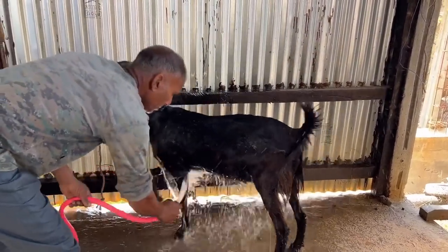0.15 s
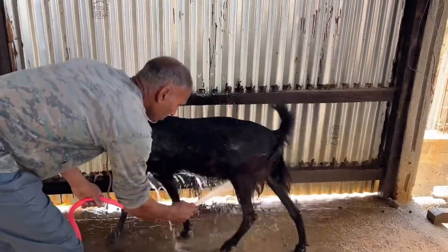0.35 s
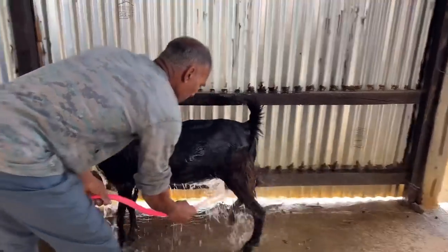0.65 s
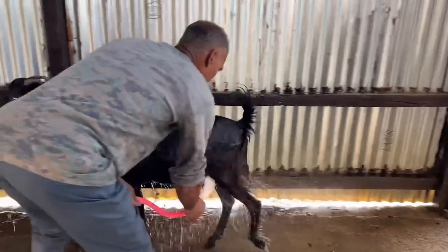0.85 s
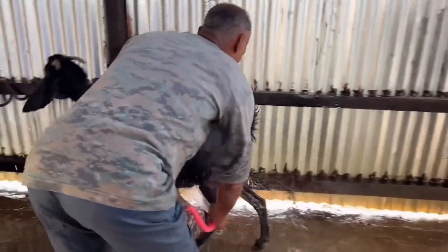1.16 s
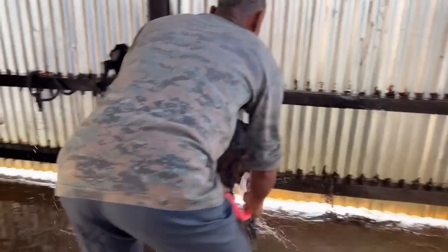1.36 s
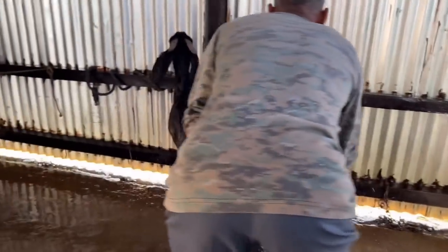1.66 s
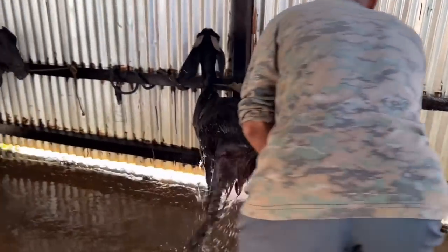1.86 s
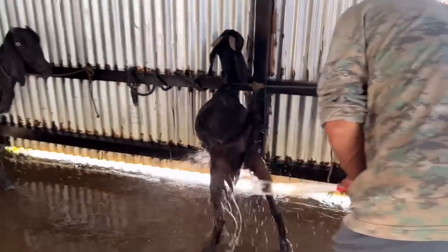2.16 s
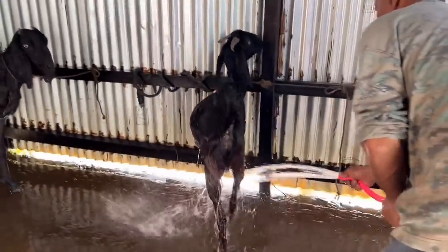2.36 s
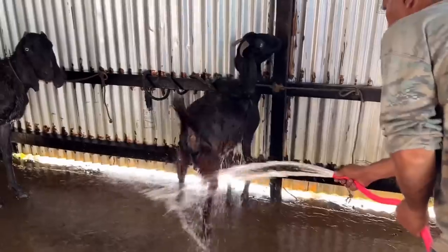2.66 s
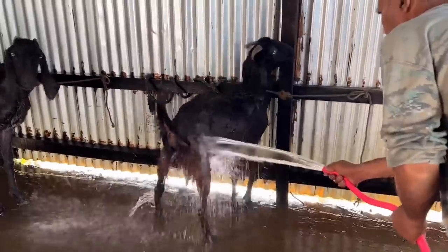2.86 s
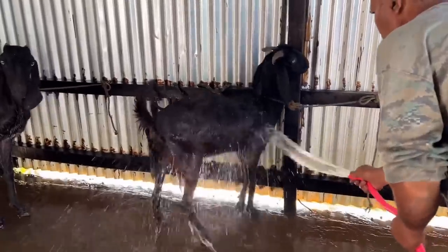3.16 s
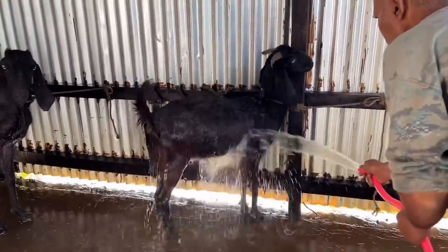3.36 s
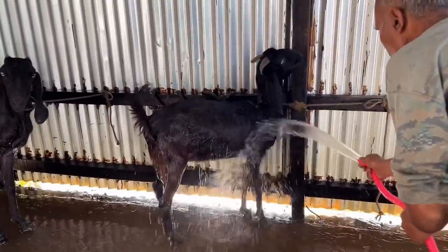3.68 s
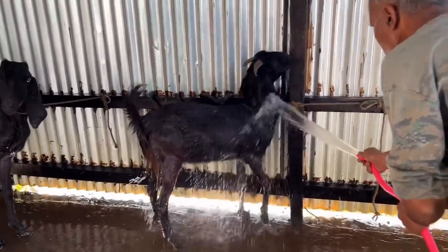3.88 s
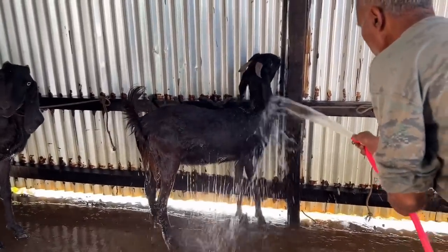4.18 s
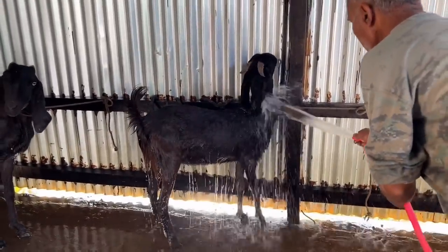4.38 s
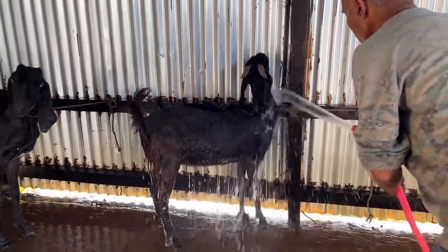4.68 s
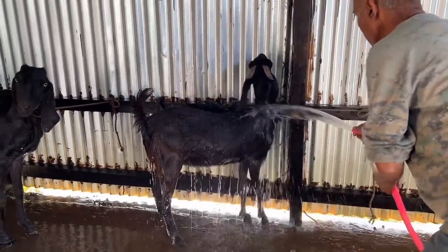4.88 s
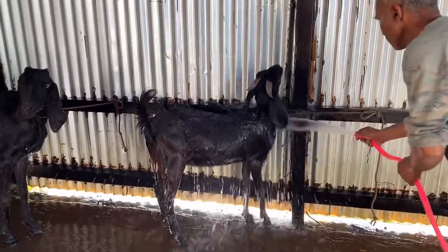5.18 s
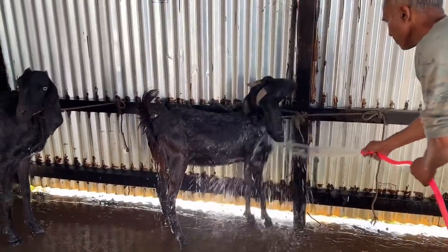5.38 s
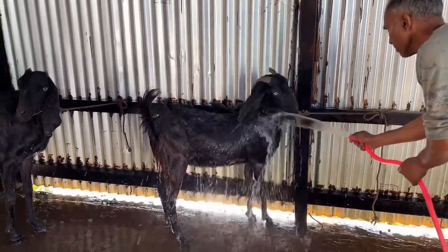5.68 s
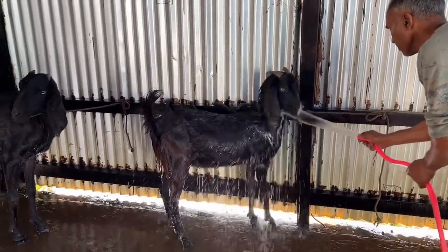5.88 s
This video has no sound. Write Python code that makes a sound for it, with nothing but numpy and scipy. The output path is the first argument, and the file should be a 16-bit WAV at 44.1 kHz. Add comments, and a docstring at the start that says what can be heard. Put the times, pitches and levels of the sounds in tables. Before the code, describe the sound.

Close, hollow drumming of water on a corrugated iron wall comes in quick surges over the bright fizz of a hose washing a goat. The drumming eases, leaving uneven spatter on wet coat and concrete and heavy drops that plink with a slight shed echo. The jet strikes the metal again briefly past the middle and several more times toward the end, over faint yard noise.

```python
"""In a shed of corrugated iron, a garden hose washes a goat. The jet fizzes on the wet coat and
spatters on the concrete as a dense train of small impacts. Whenever it sweeps past the animal it
drives the iron wall into forced vibration, and the sheet drums, booms and knocks at its normal modes.
Heavy drops slap the floor, ring the air they trap and echo in the shed. Over steady yard noise,
a low hum wavers and two modes of the sheet sing on for a moment."""
import sys
import numpy as np
from scipy import signal
from scipy.fft import rfft, irfft, next_fast_len
from scipy.io import wavfile
from scipy.ndimage import uniform_filter1d, map_coordinates

SR = 44100
rng = np.random.default_rng(int(sys.argv[2]) if len(sys.argv) > 2 else 0)


def wav_out(sig):
    """Save sig, one row per channel (or a flat mono array), as 16-bit PCM at SR to the path in sys.argv[1]."""
    wavfile.write(sys.argv[1], SR, np.round(np.clip(np.atleast_2d(sig).T, -1, 1) * 32767).astype(np.int16))


N = 266239


def amp(db):
    """Amplitude ratio of a level in decibels."""
    return 10 ** (np.asarray(db) / 20)


def unit(x):
    """Normalisation to an rms of 1."""
    return x / np.sqrt(np.mean(x ** 2) + 1e-20)


def along(points, hz):
    """Interpolation of (frequency, value) points on a logarithmic frequency axis."""
    f, values = np.transpose(points)
    return np.interp(np.log(hz + 1), np.log(f + 1), values)


def curves(rows):
    """Linear interpolation in time: one value per sample for each column after the first."""
    times, *columns = np.transpose(rows)
    return [np.interp(np.arange(N) / SR, times, column) for column in columns]


def wobble(rate):
    """Smooth random modulation through rate knots a second."""
    return map_coordinates(rng.standard_normal(int(N * rate / SR) + 4), [np.arange(N) * rate / SR])


def filtered(x, response):
    """Linear filtering: the spectrum is multiplied by a complex frequency response."""
    m = next_fast_len(N + 8192)
    return irfft(rfft(x, m) * response(np.fft.rfftfreq(m, 1 / SR)), m)[..., :N]


def grainy_noise(spectrum, spread_db, grain_s, patchy_db):
    """Modulated noise, as of many impacts: two streams, uneven in patches of time and frequency."""
    size_db = spread_db * np.array([wobble(1 / grain_s), wobble(1 / grain_s)])
    spectra = signal.stft(amp(size_db) * rng.standard_normal((2, N)), nperseg=256)[2]
    patches = uniform_filter1d(rng.standard_normal(spectra.shape[1:]), size=5, axis=0)
    patches = uniform_filter1d(patches, size=8, axis=1)
    pair = signal.istft(spectra * amp(patchy_db * unit(patches)), nperseg=256)[1][:, :N]
    return unit(filtered(pair, lambda hz: amp(along(spectrum, hz))))


# Normal modes of the iron sheet: (frequency [Hz], bandwidth [Hz], gain [dB])
SHEET_MODES = [(67, 4.3, -16), (143, 24, 1), (206, 28, -4.5), (242.3, 6.8, -2.5), (286, 16, -3.5),
               (384, 30, -8), (424, 40, -6), (484.6, 21, -5), (577, 70, -9.5), (712, 31, -5.5),
               (801, 15, -14), (936, 20, -24), (1301, 20, -11), (1480, 23, -12), (1607, 20, -11)]
def sheet_response(f):
    """Modal superposition: damped resonances add to a flat response between the modes."""
    return 0.4 + sum(amp(db) * 1j * f * width / (hz * hz - f * f + 1j * f * width)
                     for hz, width, db in SHEET_MODES)


# The jet crossing the wall; boom, thud, clang and rattle are relative to the drumming level,
# and a tilt is the upper half of a band over its lower half: (start [s], rise [s], hold [s],
# level [dB], boom [dB], thud [dB], clang [dB], clang tilt [dB], rattle [dB], rattle tilt [dB])
CROSSINGS = [(0.0, 0.0043, 0.052, -30, -8, -14, -2.5, 0, -6.5, -0.5),
             (0.165, 0.01, 0.013, -27.5, -16, -19, -8.5, 2, -6.5, -2),
             (0.257, 0.025, 0.039, -19.5, -16, -8.5, -3.5, 9.5, -4, 0),
             (0.356, .033, 0.069, -20.5, -16, -1, -3.5, 6, -5.5, 1),
             (0.456, 0.058, 0.1, -21, -14, -14, 0, 3, -2, -1),
             (0.61, 0.035, 0.063, -21, -10, -4.5, 0, 3, -3.5, 1.5),
             (.743, .038, 0.025, -30, -19, -9, 5.5, 0, 1.5, .4),
             (0.834, 0.039, 0.089, -20.5, -7.5, -6, -0.5, -2, -1, 2.5),
             (1.093, 0.043, 0.055, -22, -3.5, -1, 2, -4.5, 1, -1),
             (1.318, 0.086, 0.086, -24, -32, -12, -3.5, -2, -3.5, -1),
             (1.538, 0.009, 0.024, -21, -10, -14, -1, -1, -4.5, 8),
             (1.597, 0.019, 0.033, -28.5, -5, -8, -16, 4, -11.5, -15),
             (1.829, 0.0082, 0.043, -23, -27, -11, -4.5, -2, -5.5, -1.5),
             (2.2, 0.044, 0.062, -34, -27, -29, -0.5, 1, -2.5, -2),
             (2.582, 0.07, 0.16, -37.5, -23, -18, -2.5, 0, -3.5, 2),
             (3.254, 0.036, .01, -41, -12, -3, -5, -3, -9, 3),
             (3.409, 0.016, 0.01, -32.5, -26, -20, 0, 1, -1, 5),
             (3.474, 0.048, .01, -37.5, -26, -23, 5.5, -4, -1.5, -5),
             (3.575, 0.015, 0.029, -25.5, -35, -15, 1, 2, -2.5, -2.5),
             (3.636, 0.027, 0.049, -24.5, -19, -11, -3.5, .4, -4, 0),
             (4.35, .03, .034, -45.5, -17, -13, -10, .4, -9, .4),
             (4.441, 0.018, 0.033, -43, -9, -0.5, -6, 3, -5, -4),
             (4.674, .017, .026, -47, -10, -12, -6, -1, -19, .4),
             (4.765, 0.051, 0.014, -19.5, -13, -9, -1, 1.5, -0.5, 0),
             (5.13, 0.042, 0.067, -21, -18, -9.5, -3, -7, -5.5, -5),
             (5.478, .04, 0.03, -25, -10.5, -3, -1, -3, -2, -3),
             (5.535, .03, 0.05, -21, -10.5, -4, 2, -4, -3, -3.5),
             (5.919, 0.025, 0.12, -34.5, -27, -8.5, -3, -2, -1, -1)]
def crossing_envelope(offsets_db, fade_db_per_s):
    """Incoherent addition: each crossing rises, holds and decays exponentially; their powers sum."""
    t, power = np.arange(0, N + 32, 32) / SR, 0
    for (start, rise, hold, db, *_), offset_db in zip(CROSSINGS, offsets_db):
        front = np.clip((t - start) / max(rise, .005), 0, 1)
        decay_db = fade_db_per_s * np.maximum(t - start - rise - hold, 0)
        power = power + (front * amp(db + offset_db - decay_db)) ** 2
    return np.interp(np.arange(N) / SR, t, np.sqrt(power))


def tilted(band, level_db, tilt_db, split_hz, fade):
    """Spectral tilt: each crossing excites the two halves of a band in its own proportion."""
    low = filtered(band, lambda hz: 1 / (1 + (hz / split_hz) ** 8))
    return (crossing_envelope(level_db - tilt_db / 2, fade) * low
            + crossing_envelope(level_db + tilt_db / 2, fade) * (band - low))


# Spectra of the jet's force on the wall, in five bands: (frequency [Hz], relative level [dB])
BOOM_BAND = [(22, -40), (38, -21), (50, 4), (68, 6), (95, 16), (125, -8), (200, -58)]
THUD_BAND = [(80, -43), (118, -7.5), (150, 0), (185, -2), (250, -51)]
DRUM_BAND = [(140, -24), (200, -2), (270, 1.5), (350, 2.5), (480, -31)]
CLANG_BAND = [(280, -38), (380, 0), (500, 1), (680, 2), (950, -38)]
RATTLE_BAND = [(550, -36), (760, -3.5), (1000, -4.5), (1700, -8), (2600, -13.5), (5000, -36), (9000, -64)]
BOOM_FADE, THUD_FADE, DRUM_FADE, CLANG_FADE, RATTLE_FADE = 45, 65, 79, 95.5, 110  # decay rates [dB/s]
def wall_drumming():
    """Forced vibration: slugs of water drive the sheet, from the panel's boom to the ribs' rattle."""
    def struck(band, patchy_db):
        """The sheet's response to a band of random impacts."""
        return unit(filtered(grainy_noise(band, 0.19, 0.0048, patchy_db), sheet_response))
    *_, boom_db, thud_db, clang_db, clang_tilt, rattle_db, rattle_tilt = np.transpose(CROSSINGS)
    slugs_db = 0.54 * wobble(30) + 0.52 * wobble(13)
    drum = crossing_envelope(np.zeros(len(CROSSINGS)), DRUM_FADE) * struck(DRUM_BAND, 0.8)
    clang = tilted(struck(CLANG_BAND, 0.98), clang_db, clang_tilt, split_hz=450, fade=CLANG_FADE)
    thud = crossing_envelope(thud_db, THUD_FADE) * amp(0.77 * wobble(14)) * struck(THUD_BAND, 0.19)
    rattle = tilted(struck(RATTLE_BAND, 0.79), rattle_db, rattle_tilt, split_hz=1200, fade=RATTLE_FADE)
    # the heavy panel follows slowly
    swell = uniform_filter1d(crossing_envelope(boom_db, BOOM_FADE), size=SR // 25)
    return amp(slugs_db) * (drum + clang + thud + rattle) + swell * struck(BOOM_BAND, 0.2)


def panel_thumps(hz=68, t60_s=0.57, over_boom_db=-2):
    """Damped free vibration: the first push of each crossing sets the lowest panel mode swinging."""
    out, t = np.zeros(N + SR), np.arange(SR) / SR
    swing = np.sin(2 * np.pi * hz * t) * amp(-60 * t / t60_s) * (1 - np.exp(-t / 0.016))
    for start, _, _, db, boom_db, *_ in CROSSINGS:
        out[round(start * SR):][:SR] += amp(db + boom_db + over_boom_db) * swing
    return out[:N]


def bubbles(count, centre_hz, cycles, spread_db):
    """Bubble resonance: tiny air pockets ping for a few cycles, rising in pitch, in two streams."""
    when, pitch, size, side = rng.random((count, 4)).T[:, :, None]
    hz = centre_hz * np.exp(1.3 * (pitch - .5))
    length = 300
    t = np.arange(length) / SR
    strength = amp(-spread_db * np.log(size + 0.0093))
    pings = strength * np.sin(2 * np.pi * hz * t * (1 + 8 * t)) * np.exp(-t * hz / cycles)
    at = (when * N).astype(int) + np.arange(length) + (side > .5) * (N + length)
    streams = np.bincount(at.ravel(), pings.ravel(), 2 * (N + length)).reshape(2, -1)
    return unit(streams[:, :N])


# Spatter on coat and concrete: (time [s], level [dB])
SPATTER_LEVELS = [(0.0, -34), (0.12, -37), (0.13, -31), (0.2, -28), (0.25, -32), (0.28, -25.5),
                  (0.32, -31.5), (0.42, -27), (0.55, -32.5), (0.62, -31), (0.64, -27.5), (0.74, -29),
                  (0.76, -30.5), (0.97, -27), (1.04, -36.5), (1.14, -26), (1.21, -34), (1.27, -38),
                  (1.33, -38), (1.38, -36), (1.4, -28.5), (1.46, -32.5), (1.53, -37.5), (1.56, -29.5),
                  (1.63, -35.5), (1.71, -42.5), (1.79, -37), (1.85, -30), (2.0, -37.5), (2.04, -35.5),
                  (2.13, -32), (2.24, -40.5), (2.42, -30.5), (2.47, -34), (2.56, -30.5), (2.66, -30),
                  (2.74, -36), (2.77, -30), (2.81, -32.5), (2.86, -28), (3.14, -36), (3.16, -32),
                  (3.19, -37), (3.28, -28), (3.36, -38), (3.395, -37), (3.41, -29), (3.56, -35),
                  (3.63, -31), (3.73, -29), (3.82, -35.5), (3.85, -29), (4.12, -30.5), (4.18, -28.5),
                  (4.77, -30.5), (4.79, -26.5), (4.82, -25), (4.89, -32), (5.03, -28.5), (5.14, -34.5),
                  (5.18, -30.5), (5.25, -31), (5.3, -27), (5.36, -31), (5.5, -37), (5.52, -29),
                  (5.61, -26.5), (5.83, -35), (6.04, -33)]
# Balance set by what the jet lands on, relative to the spatter: (time [s], splash [dB], mist [dB])
SPRAY_BALANCE = [(0.0, -7, -4.5), (.5, -8, -4), (1.0, -8, -1.5), (1.25, -4, -7), (1.45, -17, -7),
                 (1.7, -8, -12), (2.0, -6, -2.5), (2.28, -1.5, -2.5), (2.4, -11.5, 0.5), (2.6, -3.5, -4.5),
                 (2.88, -9.5, -2), (3.0, -7.5, -1), (3.16, -5, -2), (3.28, -6.5, -4), (3.4, -10.5, 0),
                 (3.7, -8, -0.5), (4.0, -6.5, -3.5), (4.5, -8.5, -2), (4.85, -3.5, -3), (5.3, -4, -4),
                 (5.7, -5, -4), (6.04, -8.5, -1)]
# Spectra of the spray, coarse to fine: (frequency [Hz], relative level [dB])
SPLASH_BAND = [(900, -23), (1800, -9), (2600, -3.5), (3600, -2), (5500, -17)]
SPATTER_BAND = [(2500, -26), (4000, -3.5), (5000, -1), (6300, 2), (7500, -1), (8700, 1.5), (9800, -1),
                (12000, -85)]
MIST_BAND = [(8500, -111), (10500, 5), (11500, -6.5), (13000, -11), (15800, -11)]
def spray():
    """Impact noise: the jet bursts into splash, spatter and mist that flutter together."""
    (spatter_db,), (splash_db, mist_db) = curves(SPATTER_LEVELS), curves(SPRAY_BALANCE)
    flutter_db = 0.94 * wobble(25.13) + 0.5 * wobble(90)
    spatter = amp(2) * grainy_noise(SPATTER_BAND, 0.76, 0.0023, 1.0)
    spatter += amp(-10) * bubbles(count=2500, centre_hz=6500, cycles=2.0, spread_db=1.2)
    mist = amp(mist_db + 0.3 * wobble(14)) * grainy_noise(MIST_BAND, 0.78, 0.0016, 2.9)
    splash = grainy_noise(SPLASH_BAND, 0.28, 0.0021, 0.84)
    splash += amp(-7) * bubbles(count=5000, centre_hz=3750, cycles=2.9, spread_db=1.1)
    coat_drips = amp(-15) * bubbles(count=900, centre_hz=1250, cycles=2.8, spread_db=2.4)
    # water thrown back off the wall follows the upper half of the rattle
    *_, rattle_db, rattle_tilt = np.transpose(CROSSINGS)
    rebound = crossing_envelope(rattle_db + rattle_tilt / 2 - 11, RATTLE_FADE)
    coarse_gain = np.hypot(amp(spatter_db + splash_db + 0.7 * wobble(11)), rebound)
    return amp(flutter_db) * (amp(spatter_db) * (spatter + mist) + coarse_gain * (splash + coat_drips))


# Spectrum of the yard's background: (frequency [Hz], relative level [dB])
YARD_BAND = [(20, -28), (55, 7.5), (90, 1), (200, -6.5), (500, -9.5), (1000, -14), (2000, -13), (5000, -47),
             (15000, -26)]
def yard():
    """Ambient noise: a faint broadband floor, strongest in the bass."""
    return amp(-41.5) * grainy_noise(YARD_BAND, spread_db=1.0, grain_s=0.046, patchy_db=1.2)


# Heavy drops on the wet floor; crack and scatter are relative to the ring: (time [s], ring level [dB],
# pitch [Hz], crack [dB], crack length [s], scatter [dB], left minus right [dB])
HEAVY_DROPS = [(0.126, -30, 5230, 4, 0.0054, -15, 2.5), (1.108, -21, 4070, -6, .006, -15, -1),
               (1.805, -26, 2450, -3, 0.007, -8, 8), (1.815, -28, 2450, -7, .011, -10, -13),
               (1.83, -29, 2300, -2, 0.01, -12, 3), (2.113, -26.5, 3620, -3, 0.0054, -15, 4),
               (2.593, -28, 3880, 3, .004, -19, 5), (2.855, -27, 4400, -4, .005, -22, 0),
               (2.953, -22, 3260, -14, .006, -21, -3), (3.167, -23.5, 3350, 0.5, 0.0066, -17, .5),
               (3.267, -23, 5800, -3, 0.0093, -10, 2), (3.404, -16, 4200, 2.5, 0.004, -15, -3),
               (3.644, -23, 3480, 0, .006, -9, -2), (4.024, -26, 4180, -8, 0.0046, -21, -12),
               (4.069, -22.5, 2880, 0.5, 0.0065, -10.5, 1), (4.147, -29, 3430, -6, .005, -5, -6),
               (4.352, -24.5, 3400, -2.5, .007, -12, 0), (4.4065, -20, 2230, -9, .005, -14, 1),
               (4.407, -17.5, 2770, -8, .005, -22, -3), (4.439, -21, 4740, -8, .005, -21, 1),
               (4.668, -27, 2400, -6, 0.0057, -12, 0), (4.738, -25, 5530, 1, .005, -19, 7),
               (4.783, -19.5, 3940, -10, 0.0054, -10, -2), (5.401, -34.5, 3360, 5, 0.015, -6, 0),
               (5.507, -27, 1940, 3, 0.0088, -13, 0), (5.914, -27.5, 3880, -7, 0.006, -11, 1.5)]
def floor_slaps(ring_t60_s=0.019, scatter_t60_s=0.37):
    """Impact and cavity resonance: each drop cracks, rings the air it traps and scatters droplets."""
    out, t = np.zeros((2, N + SR)), np.arange(SR // 10) / SR
    f = np.fft.rfftfreq(len(t), 1 / SR)
    attack = 1 - np.exp(-t / .0003)
    def noise_band(hz, log_width):
        """Band-pass noise centred on the drop's pitch."""
        rolloff = 1 + (np.log((f + 1) / hz) / log_width) ** 4
        return unit(irfft(rfft(rng.standard_normal(len(t))) / rolloff, len(t)))
    for start, db, hz, crack_db, crack_s, scatter_db, pan_db in HEAVY_DROPS:
        ring = np.sin(2 * np.pi * hz * t) * amp(-60 * t / ring_t60_s)
        crack = amp(crack_db - 60 * (t / crack_s) ** 2) * noise_band(hz, log_width=0.55)
        scatter = amp(scatter_db - 60 * t / scatter_t60_s) * noise_band(hz, log_width=0.25)
        gains = amp(db + np.array([[pan_db], [-pan_db]]) / 2)
        out[:, round(start * SR):][:, :len(t)] += gains * attack * (ring + crack + scatter)
    return out[:, :N]


# Decay of sound in the shed: (frequency [Hz], reverberation time [s])
SHED_T60 = [(200, 0.36), (2000, 0.61), (10000, 0.027)]
def shed_echo(x):
    """Reverberation: convolution with a diffuse tail in which each frequency decays at its own rate."""
    hz, t, spectra = signal.stft(rng.standard_normal((2, SR // 2)), SR, nperseg=256)
    decay = amp(-60 * t / along(SHED_T60, hz)[:, None])
    tail = signal.istft(spectra * decay, SR, nperseg=256)[1]
    return signal.fftconvolve(x, tail / np.linalg.norm(tail[0]), axes=1)[:, :N]


# The heaviest slugs of water on the wall: (middle of the push [s], peak level [dB], pitch [Hz])
HEAVY_SLUGS = [(.18, -26, 269), (.28, -18, 290), (.31, -16, 255), (.327, -15, 269), (.378, -17, 200),
               (.395, -12.5, 301), (.507, -12.5, 320), (.602, -18, 657), (.651, -16, 291), (.654, -17, 161),
               (.872, -18, 452), (.901, -18, 301), (.945, -17, 183), (1.131, -14, 75), (1.156, -18, 506),
               (1.22, -21, 474), (1.241, -21, 70), (1.556, -19, 334), (1.621, -21, 280), (1.851, -21, 183),
               (2.28, -31, 265), (3.596, -20, 506), (3.666, -20, 226), (4.823, -18, 269), (4.853, -19, 301),
               (4.858, -19, 161), (5.172, -18.5, 334), (5.205, -20, 323), (5.246, -20, 301),
               (5.558, -15, 205), (5.567, -15.5, 452), (5.584, -16, 205), (5.588, -16, 380),
               (5.61, -16.5, 248), (5.615, -15.5, 441)]
def wall_knocks():
    """Transient excitation: each slug pushes briefly, and the sheet modes near its pitch ring out."""
    out, t = np.zeros(N + SR), np.arange(SR // 2) / SR
    response = sheet_response(np.fft.rfftfreq(len(t), 1 / SR))
    for (middle, db, hz), phase in zip(HEAVY_SLUGS, rng.random(len(HEAVY_SLUGS))):
        push_s = .016 + 2 / hz
        press = np.sin(np.pi * np.clip(t / push_s, 0, 1)) ** 2
        force = press * np.sin(2 * np.pi * (hz * t + phase))
        ring = irfft(rfft(force) * response, len(t))
        out[round((middle - push_s / 2) * SR):][:len(t)] += amp(db) * ring / np.abs(ring).max()
    return out[:N]


def wavering_tone(levels, hz, waver_hz, waver_db):
    """Random frequency and amplitude modulation of a sine that fades at both ends of its table."""
    db, = curves(levels)
    t = np.arange(N) / SR
    gate = np.clip(np.minimum(t - levels[0][0], levels[-1][0] - t) / 0.038, 0, 1)
    envelope = np.sqrt(2) * gate * amp(db + waver_db * wobble(3.2))
    return envelope * np.sin(2 * np.pi * np.cumsum(hz + waver_hz * wobble(15)) / SR)


# Envelope of the low hum: (time [s], level [dB])
HUM_LEVELS = [(1.9, -40), (2.25, -45), (2.43, -40.5), (2.76, -53), (2.9, -42), (3.12, -40), (3.25, -53),
              (3.65, -56), (4.15, -43), (4.3, -71)]
def low_hum():
    """Slow modulation: a low tone wavers in pitch and level."""
    return wavering_tone(HUM_LEVELS, hz=89, waver_hz=2.13, waver_db=2.1)


# Envelopes of two lingering sheet modes: (time [s], level [dB])
UPPER_MODE_LEVELS = [(2.26, -36), (2.31, -38), (2.45, -46.5), (2.56, -53), (2.7, -52), (2.8, -46),
                     (2.9, -52)]
LOWER_MODE_LEVELS = [(2.55, -56), (2.626, -43), (2.7, -65), (2.908, -54), (2.944, -34), (3.008, -41),
                     (3.1, -52)]
def singing_sheet():
    """Resonance: two modes of the sheet ring on faintly, each as a nearly pure tone."""
    upper = wavering_tone(UPPER_MODE_LEVELS, hz=247, waver_hz=2.2, waver_db=1.5)
    lower = wavering_tone(LOWER_MODE_LEVELS, hz=220, waver_hz=1.53, waver_db=2.3)
    return upper + lower


# Likeness of the two channels: (frequency [Hz], coherence [0-1])
COHERENCE = [(60, 0.99), (290, 0.93), (640, 0.64), (1400, 0.3), (3100, 0.32), (6000, 0.16), (8500, 0.4),
             (9700, 1), (15000, 0.96)]
# Phase difference between them: (frequency [Hz], lead of the left [rad])
PHASE_LEAD = [(780, -.05), (1810, -1.1), (2500, .4), (7670, .6), (8700, -.1), (9800, -2.8), (10600, -3.4),
              (11600, -6), (12700, -6.6), (13300, -9.1), (14300, -9.7), (14900, -12.3), (16000, -12.7)]
# Level difference between them: (frequency [Hz], left minus right [dB])
LEVEL_LEAN = [(60, 0.5), (180, 0), (550, 0.8), (1650, 0), (4970, 3), (9000, 0.4), (15000, -0.3)]
def stereo_field(pair):
    """Partial coherence: two independent streams become a common and an opposed share of each channel."""
    def shares(hz):
        """Mid and side weights of constant total power."""
        angle = np.arccos(np.clip(along(COHERENCE, hz), 0, 1)) / 2
        return np.array([np.cos(angle), np.sin(angle)])
    mid, side = filtered(pair, shares)
    left = lambda hz: amp(along(LEVEL_LEAN, hz) / 2) * np.exp(.5j * along(PHASE_LEAD, hz))
    return np.array([filtered(mid + side, left), filtered(mid - side, lambda hz: 1 / left(hz))])


def scene():
    """Superposition: wide water and yard noise, slaps with their echo, and centred knocks and tones."""
    wide = stereo_field(wall_drumming() + spray() + yard())
    slaps = floor_slaps()
    echo = amp(-10) * shed_echo(slaps)
    return wide + panel_thumps() + slaps + echo + wall_knocks() + low_hum() + singing_sheet()


def record(dry):
    """Band limiting: an ideal low-pass filter removes the highest treble."""
    return filtered(dry, lambda hz: hz < 15850)


dry = scene()
out = record(dry)
wav_out(out)
```